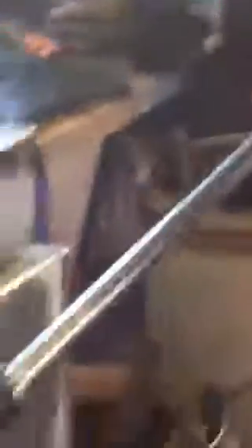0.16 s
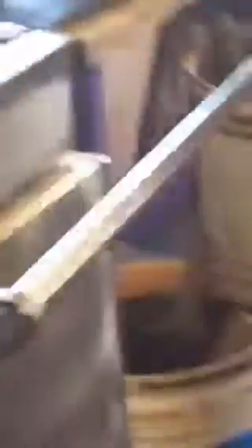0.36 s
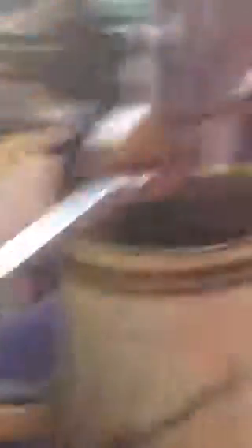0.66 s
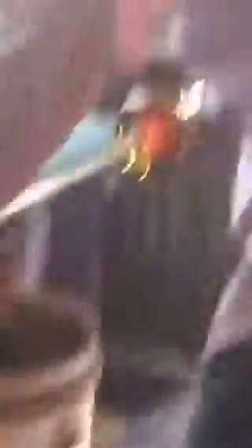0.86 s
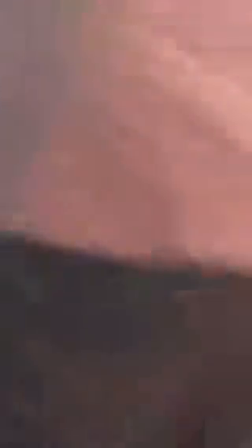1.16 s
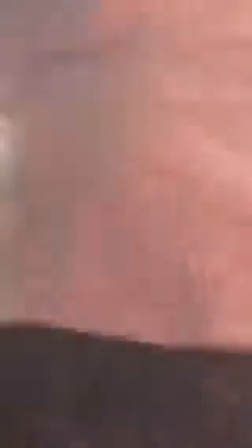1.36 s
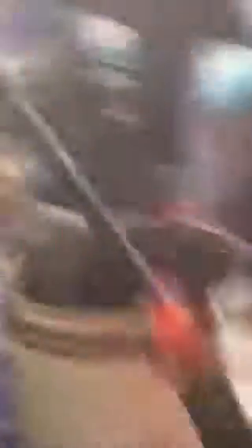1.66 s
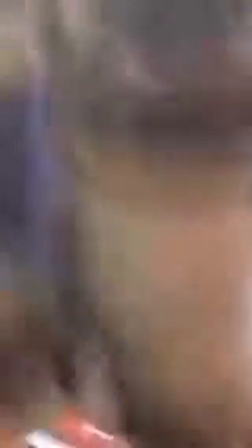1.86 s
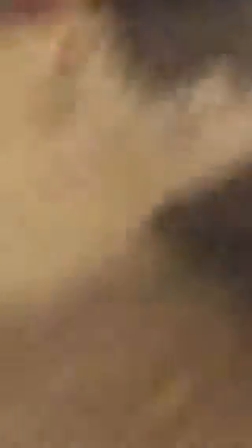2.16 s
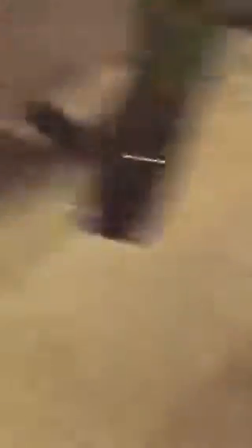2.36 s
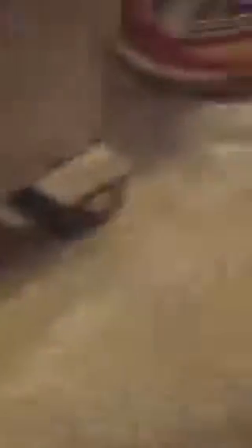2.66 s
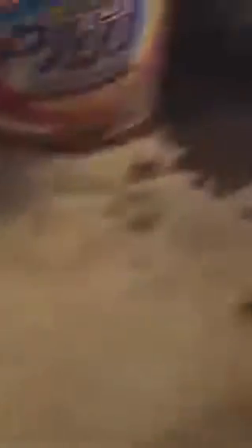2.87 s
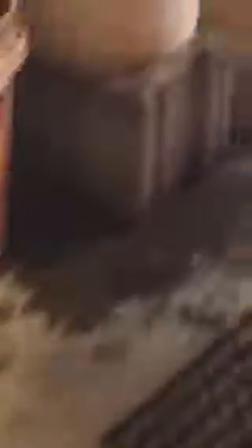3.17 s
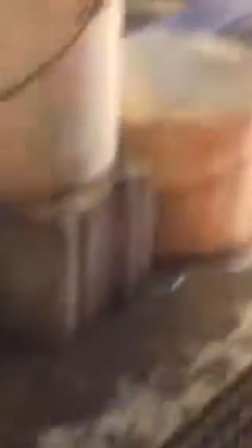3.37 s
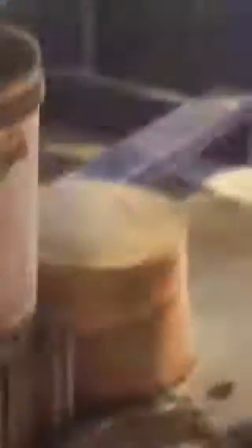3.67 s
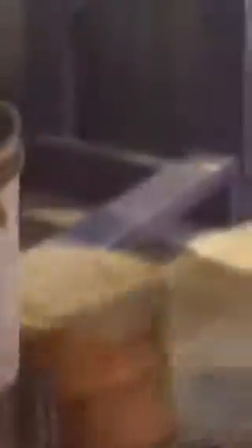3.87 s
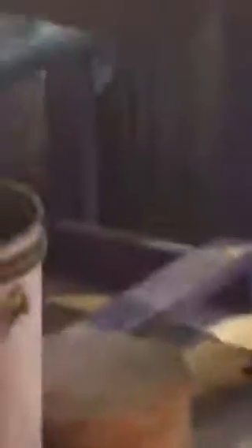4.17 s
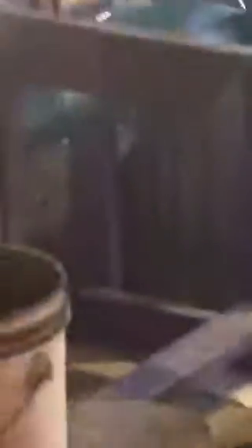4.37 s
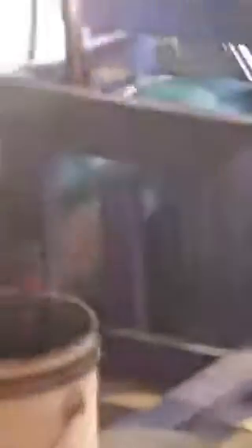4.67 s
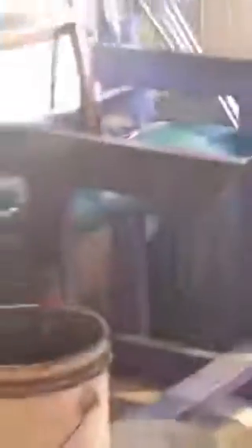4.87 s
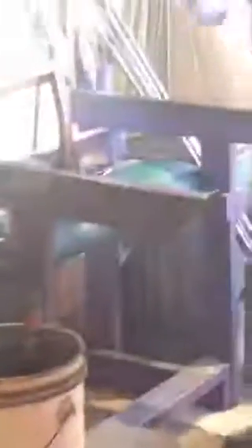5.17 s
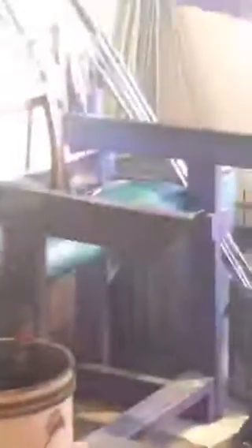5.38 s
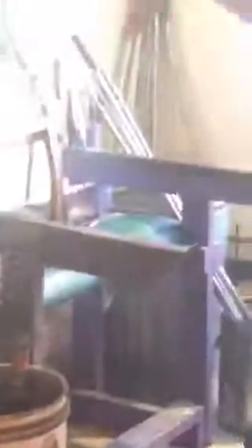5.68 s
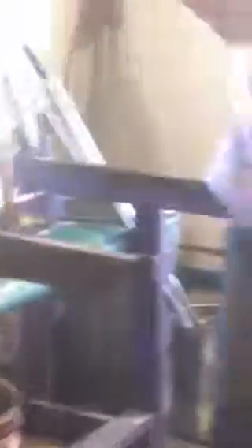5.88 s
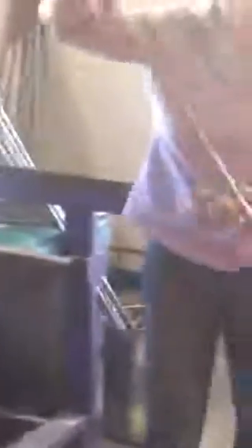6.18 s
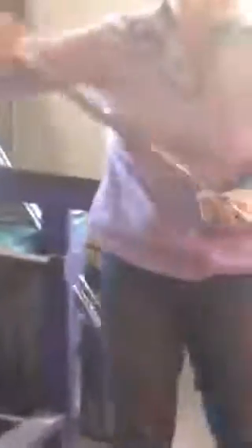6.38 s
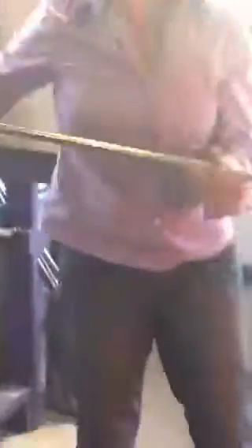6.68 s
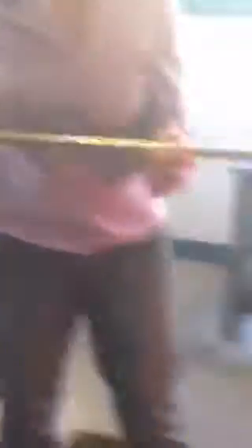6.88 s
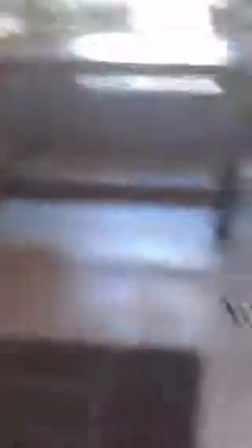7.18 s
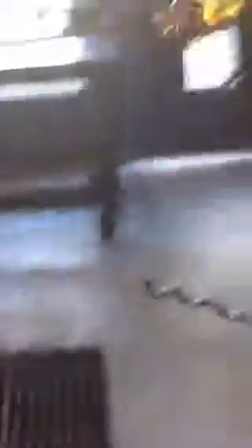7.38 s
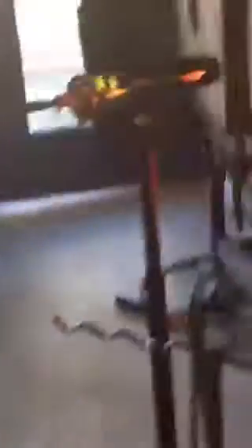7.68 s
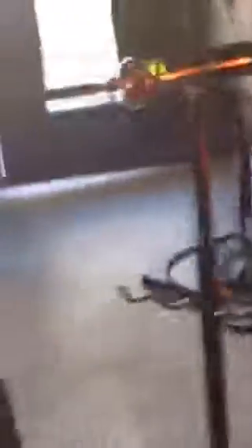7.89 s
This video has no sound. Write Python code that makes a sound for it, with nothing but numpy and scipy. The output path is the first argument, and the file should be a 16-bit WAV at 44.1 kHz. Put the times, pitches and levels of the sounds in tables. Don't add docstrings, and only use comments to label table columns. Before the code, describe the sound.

A gas furnace roars throughout, about eight seconds: deep turbulent rumble, boomy low-mid flame noise and a steady burner hiss, gently fluttering. A low hum at the start fades within the first second as the handheld phone moves off. Faint steel knocks come at 0.1 and 0.3 s, then strong sharp cracks at about 0.6, 0.9 and 1.2 s, with short rings and concrete-room echoes. Dull footfalls thump near 0, 0.7, 1.8 and 2.3 s. Softer knocks follow between 2.3 and 3.5 s, the clearest near 2.4 and 3.5. A loud double clank hits at 4.5 s, then another ringing bench knock at 5.0 with weaker ones trailing to 5.3. From there the furnace continues almost alone until a barely audible tick and faint step at 8 s. The phone dips slightly after loud hits, and the highest treble is missing.

```python
import sys
import numpy as np
from scipy import signal
from scipy.io import wavfile
from scipy.ndimage import uniform_filter1d

SR = 44100
rng = np.random.default_rng(int(sys.argv[2]) if len(sys.argv) > 2 else 0)


def gain_from_decibels(decibels):
    exponent = np.asarray(decibels, float) / 20
    return 10 ** exponent


def transcribe(u):
    v = np.clip(np.atleast_2d(u).T, -1, 1)
    q = np.round(v * 32767).astype(np.int16)
    wavfile.write(sys.argv[1], SR, q)


N = 354696
TIME_S = np.arange(N) / SR


def unit(x):
    return x / np.sqrt(np.mean(x ** 2))


def on_log(hz, table):
    points = np.array(table)
    return np.interp(np.log(hz), np.log(points[:, 0]), points[:, 1])


def band(x, hz, width):
    edges_hz = [hz - width / 2, hz + width / 2]
    return signal.sosfilt(signal.butter(2, edges_hz, "bandpass", fs=SR, output="sos"), x)


def walk(rate):
    hold = int(SR / rate)
    stairs = np.repeat(rng.standard_normal(N // hold + 1), hold)
    return 0.98 * uniform_filter1d(uniform_filter1d(stairs, hold), hold)[:N]


def furnace():
    # (time [s], way out onto the open floor [0-1])
    wander = [(0, 0), (.6, 0.5), (1.2, 0.33), (1.8, 0.85), (2.6, 0.79), (3.5, 1), (4.3, 0.84), (5.4, 0.88),
              (6.2, 1.03), (6.8, .9), (7.4, 0.87), (8.04, 0.8)]
    # (frequency [Hz], level [dB per Hz])
    roar = [(14, -33), (25, -34.5), (40, -33), (56, -14), (75, -16), (100, -18.5), (125, -8.5),
            (190, -11.5), (220, -5.5), (290, -9), (340, -19), (450, -21.5)]
    # (frequency [Hz], level [dB per Hz])
    jet_noise = [(400, -7.5), (480, -7.5), (650, -1.5), (1250, -5.5), (1420, -10.5), (2050, -7),
                 (2600, -15.5), (4100, -19), (4700, -40.5), (5600, -25.5), (7000, -30.5), (8000, -31.5),
                 (8500, -35)]
    way = np.interp(TIME_S, *np.transpose(wander))
    rumble_db = -40 - 5 * way
    flame_db = -35 + 4.5 * way
    throat_db = -39 - 3 * way
    jet_db = -45.5 - 2.5 * way

    surge_db = .6 * walk(3)
    ladder = 2 ** (np.arange(31) / 4)
    rumble = sum(turbulence(18 * ladder[:11], roar, surge_db, 1.7))
    flame = sum(turbulence(120 * ladder[:8], roar, surge_db, 1.0))
    hiss = turbulence(450 * ladder[:18], jet_noise, surge_db, 1.2)
    throat = wall_echoes(sum(hiss[:8]))
    jet = sum(hiss[8:])
    flame = unit(flame) * gain_from_decibels(-4.5) + unit(chamber_booms())
    low = unit(rumble) * gain_from_decibels(rumble_db) + flame * gain_from_decibels(flame_db)
    high = unit(throat) * gain_from_decibels(throat_db) + unit(jet) * gain_from_decibels(jet_db)
    return low + high + corner_hum()


def turbulence(centres, spectrum, surge_db, flicker_db):
    bands = []
    for hz in centres:
        level_db = on_log(hz, spectrum) + 10 * np.log10(hz) + surge_db + flicker_db * walk(9)
        bands.append(gain_from_decibels(level_db) * unit(band(rng.standard_normal(N), hz, hz / 5)))
    return bands


def chamber_booms():
    # (frequency [Hz], width [Hz], level [dB])
    chamber = [(60.3, 6.1, -21), (123.3, 10.5, -5), (147.6, 22.5, -3), (171.8, 20.5, -3.5),
               (222.8, 19.5, 2.5), (278.2, 31.7, -9.5), (580, 28, -19), (677, 45, -18.5)]
    booms = 0
    for hz, width, db in chamber:
        booms = booms + gain_from_decibels(db + walk(2.24)) * unit(band(rng.standard_normal(N), hz, width))
    return booms


def wall_echoes(throat):
    echoes = hall(np.arange(SR // 4) / SR, 0.0069)
    running = np.tile(throat, 2)[N - len(echoes):]
    echoed = signal.fftconvolve(running, echoes)[len(echoes):len(echoes) + N]
    return unit(throat) + .45 * unit(echoed)


def corner_hum():
    hum = unit(band(rng.standard_normal(N), 98.4, 16))
    return gain_from_decibels(-34) * hum * np.exp(-(TIME_S / 0.66) ** 2)


def tools():
    # (time [s], peak [dB], weight of the blow [dB], ring [dB], distance [m])
    knocks = [(0.1225, -33, -28.5, 7, 5.9), (0.3094, -32, 2, -1.5, 7.7), (0.6446, -14, -9, -9, 2.3),
              (0.8646, -15, -12.5, -1.5, 5.1), (1.2201, -12, -9.5, -13, 4.7), (2.2747, -32, 8, -2, 3.1),
              (2.4145, -20.5, 0.5, 2.5, 4), (2.9787, -28, 3, 5, 3), (3.371, -32.5, -10, -6, 3.8),
              (3.545, -24.5, 0, 1, 2), (4.5137, -15.5, -8, -4.5, 3.7), (4.536, -15.5, -6.5, 3, 2.6),
              (4.8814, -39.5, -12.5, -11.5, 4.5), (5.014, -17, -7.5, -4.5, 7.3),
              (5.119, -26, -6.5, -3.5, 7.7), (5.3004, -34, 4, 2, 4.7), (7.9704, -43, 8.5, 4, 1.3)]
    # (frequency [Hz], level [dB], time to fall 60 dB [s])
    tongs = [(1943, 0, .03), (2520, -5, .02), (3500, -8, .015), (5230, -19, .1)]
    shears = [(2000, 0, .015), (4000, -12, .04), (5922, -20, .03), (7000, -22, .12), (7806, -22, .06)]
    rod_tip = [(1710, -13.5, 0.041), (2706, 1, 0.028), (3300, -17, 0.054), (5300, -1, 0.053)]
    rod_mid = [(2157, 1.5, 0.037), (4010, -4, 0.035), (5750, -15, .2), (3380, -12, 0.037),
               (1760, -3, 0.042)]
    rod_end = [(1116, 0.5, 0.067), (2170, -7.5, 0.17), (2950, -9, 0.094), (6040, 4, 0.082)]
    pipe = [(1170, 1, 0.18), (1543, -2, 0.15), (1992, 0.5, 0.34), (2290, 1, .08), (2643, 3, 0.098),
            (3052, -7, 0.08), (3670, -9.5, .07), (4689, -7, .24), (5835, -9, 0.27), (7257, -18, .25)]
    rail = [(547, 6, 0.077), (878, 4, 0.093), (2890, -23, 0.052)]
    hook = [(2420, 8.5, .01), (1600, -14.5, .012), (5297, -30, .1), (7000, -22, .04)]
    clamp = [(1010, -2, 0.024), (2300, 4, 0.014), (4300, -17, .25), (5800, -5, .01)]
    bench = [(127, 3, .3), (279, 4, .25), (372, 1, .2), (2326, 3, .42), (2475, -4, .35), (2728, -2, .4),
             (2793, -4, .35), (3135, -6, .25), (3278, -2, .28), (3758, -5, .2), (4130, -6, .18),
             (5600, -8, .1)]
    rack = [(137, 3, 0.13), (215, 0.5, .2), (312, 2.5, 0.25), (625, -4, 0.23), (810, -4, 0.14),
            (1490, -8, .05), (2200, -15, 0.056), (3830, -4, .04), (6000, -8, 0.043)]
    pin = [(6830, -13, .03), (7940, -10, .03)]
    struck = [tongs, shears, rod_tip, rod_mid, rod_end, pipe, pipe, rail, hook,
              clamp, bench, bench, hook, rack, rack, rail, pin]
    length = 3 * SR // 4
    out, t = np.zeros(N + length), np.arange(length) / SR
    for (s, db, weight_db, ring_db, metres), modes in zip(knocks, struck):
        thud_db = weight_db + (7.5 if modes in (bench, rack) else 2.5)
        if modes in (shears, pipe):
            edge_db = -26.5
        elif modes == hook:
            edge_db = -18
        else:
            edge_db = -10.5
        swell_s = .0015 * metres
        heard = knock(t, thud_db, weight_db, edge_db, ring_db, modes, swell_s)
        start = int((s - .0035) * SR)
        first_rms = np.sqrt(np.mean(heard[:SR // 25] ** 2))
        out[start:start + length] += heard * gain_from_decibels(db - 4.5) / first_rms
    return out[:N]


def knock(t, thud_db, body_db, edge_db, ring_db, modes, swell_s):
    rattle = 0.014 * rng.standard_normal(len(t)) * np.exp(-t / 0.061)
    contact = (t == 0) + rattle
    # (frequency [Hz], width [Hz], level [dB])
    colour = ((332, 450, thud_db - 5.5), (1002, 765, body_db),
              (2770, 2870, 0.017), (6300, 6430, edge_db + 10.5))
    crack = 0
    for hz, width, db in colour:
        crack = crack + gain_from_decibels(db) * unit(band(band(contact, hz, width), hz, width))
    ring = gain_from_decibels(ring_db) * unit(metal_ring(t, modes))
    straight = (gain_from_decibels(-35) * crack + gain_from_decibels(-17) * ring) * min(1, .005 / swell_s)
    return straight + signal.fftconvolve(crack + ring, hall(t, swell_s))[:len(t)]


def metal_ring(t, modes):
    ring = 0
    for hz, db, t60 in modes:
        split, turn = rng.uniform(-1, 1, 2)
        main = np.sin(2 * np.pi * hz * t)
        twin = .3 * np.sin(2 * np.pi * (hz + 16 * split) * t + np.pi * turn)
        ring = ring + gain_from_decibels(db - 60 * t / t60) * (main + twin)
    return ring


def hall(t, swell_s):
    # (frequency [Hz], time to fall 60 dB [s])
    fading = [(250, 0.62), (1000, 0.48), (2500, 0.59), (5000, 0.47), (8000, 0.29)]
    tail = 0
    for hz in 125 * 2 ** np.arange(0, 7.):
        noise = band(rng.standard_normal(len(t)), hz, hz / np.sqrt(2))
        rise = 1 - np.exp(-t / (swell_s + 3 / hz))
        rise = rise * (1 + .006 / swell_s * np.exp(-t / .008))
        tail = tail + noise * rise * gain_from_decibels(-60 * t / on_log(hz, fading))
    return tail / np.sqrt(SR)


def footfalls():
    # (time [s], level [dB])
    footsteps = [(0.029, -35), (0.732, -36), (1.76, -31), (2.319, -27.5), (7.989, -42.5)]
    thump_hz, width_hz, t60_s, rise_s = 85, 140, .3, 0.0098
    age, out = np.arange(SR // 2) / SR, np.zeros(N + SR // 2)
    for s, db in footsteps:
        shake = unit(band(rng.standard_normal(len(age)), thump_hz, width_hz))
        rise = 1 - np.exp(-age / rise_s)
        out[int(s * SR):][:len(age)] += gain_from_decibels(db + 6 - 60 * age / t60_s) * rise * shake
    return out[:N]


def scene():
    return (furnace() + tools() + footfalls())[None]


def roll_off(x):
    return signal.sosfilt(signal.butter(12, 8350, fs=SR, output="sos"), x)


def record(dry):
    duck_from_db, duck_share, duck_s = -18.5, 0.32, .12
    loud_db = 10 * np.log10(uniform_filter1d(dry ** 2, SR // 30, axis=1) + 1e-12)
    lean_db = duck_share * np.maximum(loud_db - duck_from_db, 0)
    hold = np.exp(-1 / (duck_s * SR))
    duck_db = signal.lfilter([1 - hold], [1, -hold], lean_db)
    treble_cut = signal.cheby2(10, 40, 8600, fs=SR, output="sos")
    return roll_off(signal.sosfilt(treble_cut, dry * gain_from_decibels(-duck_db)))


dry = scene()
out = record(dry)
transcribe(out)
```